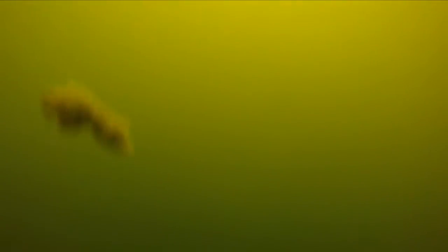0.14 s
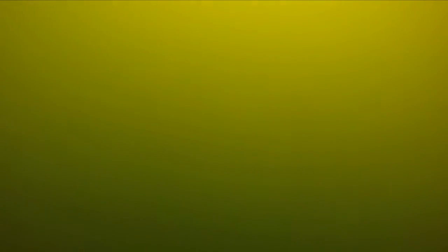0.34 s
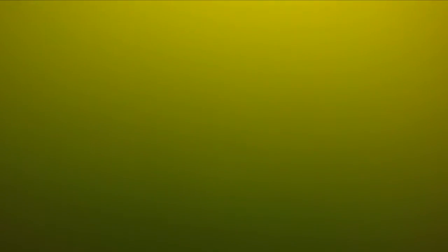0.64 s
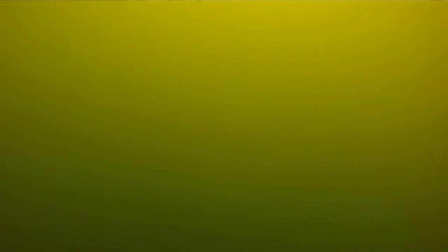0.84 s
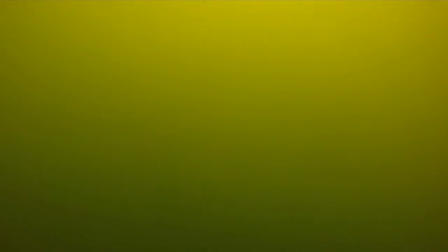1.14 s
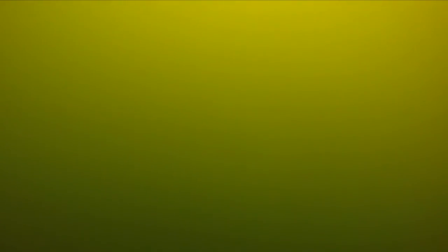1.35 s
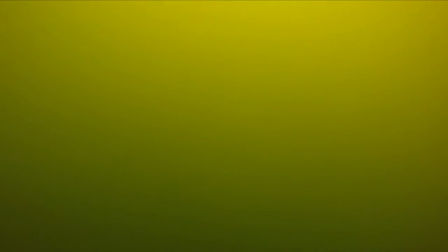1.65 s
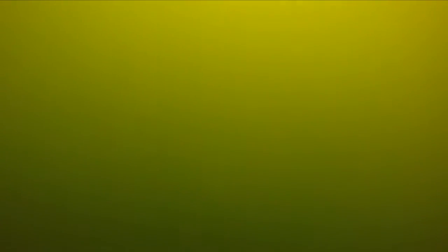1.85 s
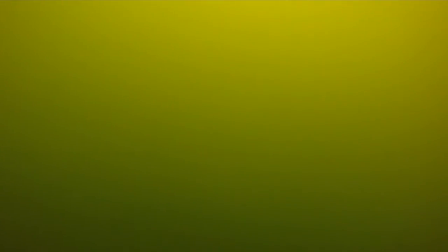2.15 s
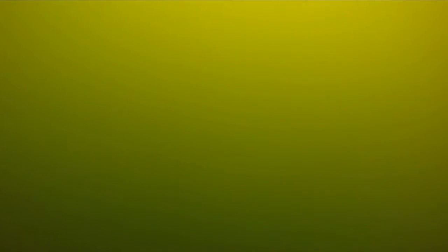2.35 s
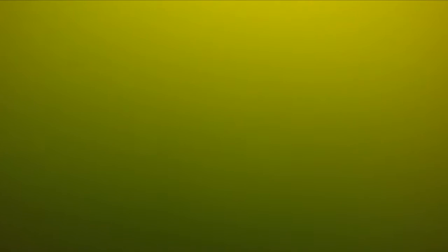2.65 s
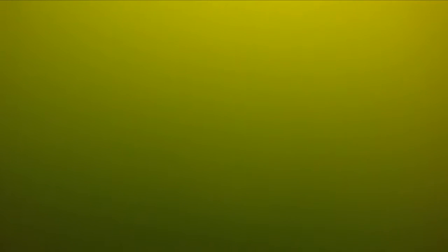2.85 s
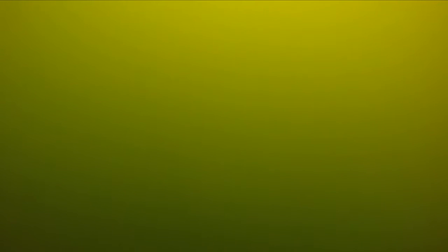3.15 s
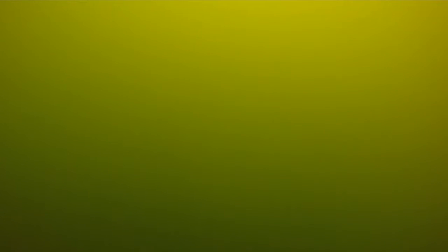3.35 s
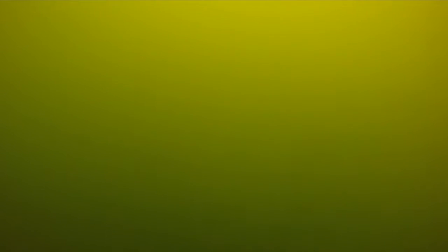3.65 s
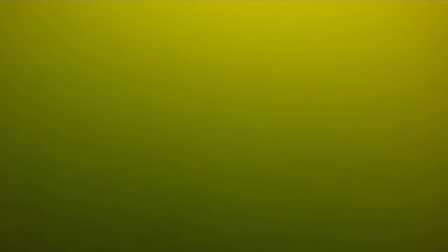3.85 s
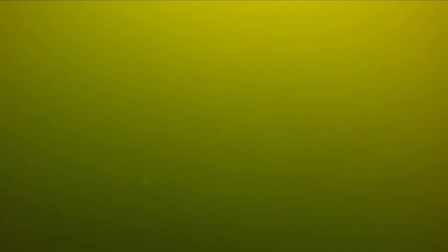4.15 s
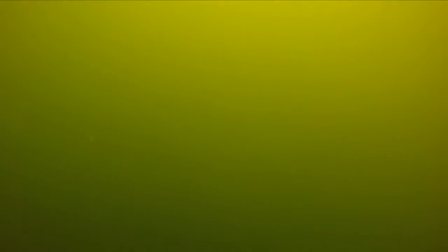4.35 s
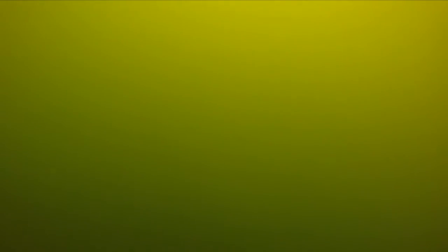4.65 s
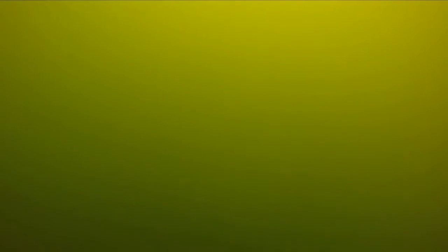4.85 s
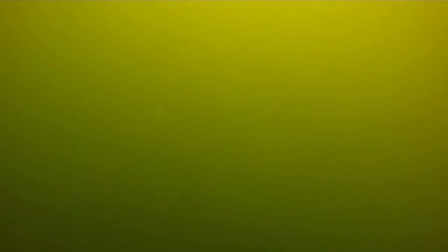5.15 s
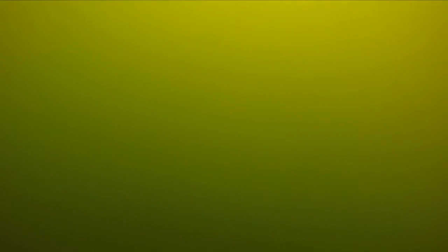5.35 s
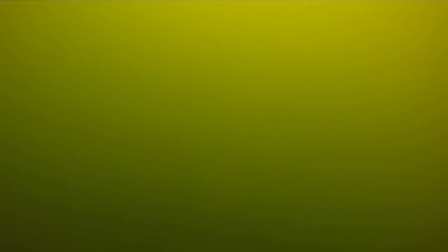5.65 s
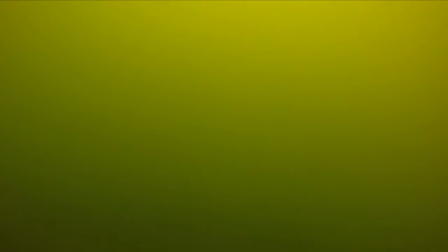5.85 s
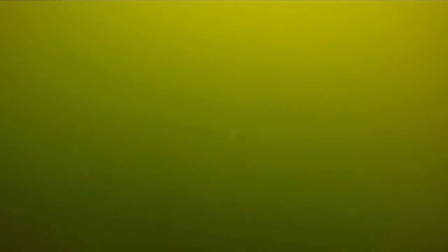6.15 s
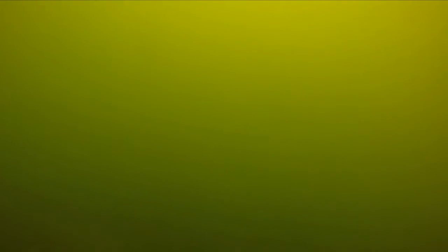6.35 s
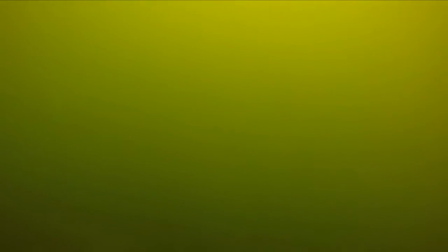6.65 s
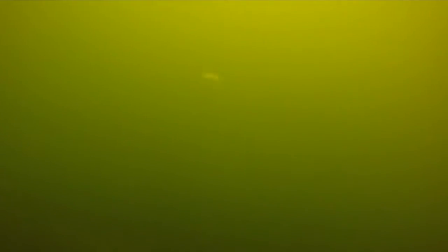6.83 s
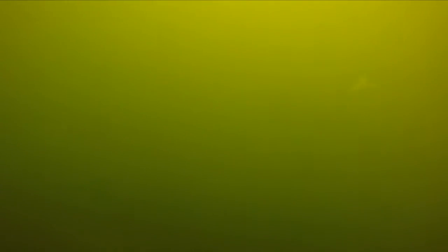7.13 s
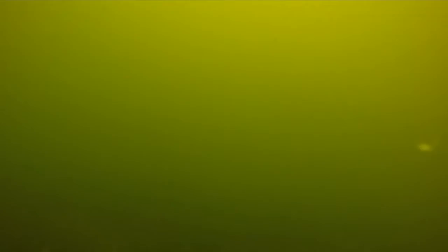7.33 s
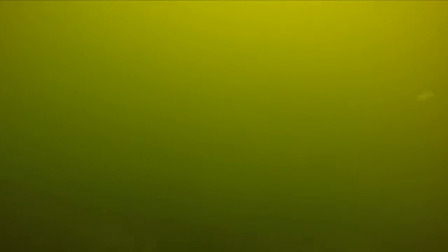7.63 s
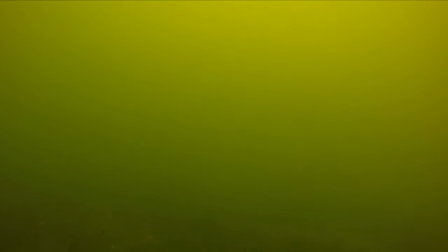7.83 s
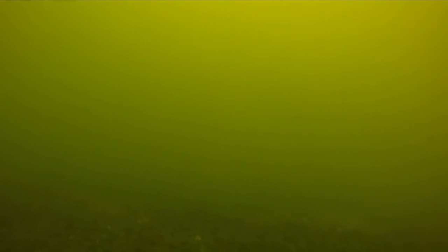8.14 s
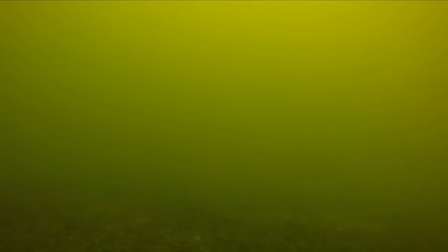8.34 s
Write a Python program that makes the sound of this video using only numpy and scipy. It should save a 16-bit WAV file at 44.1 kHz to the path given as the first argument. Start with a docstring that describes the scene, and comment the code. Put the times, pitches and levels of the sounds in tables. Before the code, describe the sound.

Heard from inside a sealed underwater housing on a weighted pot: a dense, loud clatter of thudding, chirping knocks with gritty line friction, thinning after two seconds. A few hard knocks and small bubbles follow, then quiet hollow hiss, faint electronic hum, low watery rumbles and light taps. At eight seconds the pot clanks and crunches onto the bed, then quickly settles.

```python
"""A rattle of jerky knocks under water thins out into a quiet, humming descent that ends in a hard clank.
A camera in a sealed housing, fixed to a weighted pot, is let down on a line that slips and catches.
Each knock runs down the line as a fast falling chirp and shakes the housing; slips grind and swish.
Filtered noise makes flow rumble, hiss and grit; sines make hum and bubbles; the landing is clanks and crunch."""
import sys
import numpy as np
from scipy import signal
from scipy.fft import rfft, irfft, next_fast_len
from scipy.io import wavfile
from scipy.ndimage import uniform_filter1d

SR = 44100
rng = np.random.default_rng(int(sys.argv[2]) if len(sys.argv) > 2 else 0)


def digitize_waveform(pressure):
    """Quantize a signal to 16-bit integers and store it at the path in sys.argv[1].

    Rows of a 2-D input are taken as channels; values are limited to [-1, 1].
    """
    field = np.atleast_2d(pressure).T
    bounded = np.clip(field, -1, 1)
    quanta = np.round(bounded * 32767).astype(np.int16)
    wavfile.write(sys.argv[1], SR, quanta)


N = 374409
TIME = np.arange(N) / SR  # s
KNOCK_SIZE = 8192  # samples

# the line catching, and light taps on the frame: (time [s], strength [dB], contact softness [0-1])
KNOCKS = [(.0098, -15.5, 0.13), (.03, -5, 0.16), (.0965, -5.5, 0.16), (0.1399, -15, 0.3), (.164, -10.5, .1),
          (0.2269, -5.5, 0.24), (.29, -5.5, 0.24), (.342, -9.5, 0.22), (0.3945, -10.5, 0.24),
          (0.4795, -9.5, 0.35), (0.5316, -14.5, 0.45), (.5572, -7.5, 0.23), (.602, -7, 0.33),
          (0.6321, -6.5, 0.29), (.6842, -10.5, 0.11), (.6925, -9, 0.3), (0.7164, -6, 0.19),
          (0.7621, -8.5, 0.27), (0.79, -7, 0.26), (0.8407, -10, 0.17), (.866, -5.5, 0.24),
          (0.9013, -11, 0.32), (0.9353, -6, 0.14), (0.9827, -12.5, 0.08), (0.9918, -11.5, 0.22),
          (1.0147, -6.5, .15), (1.0656, -13, 0.23), (1.0932, -7, 0.24), (1.1439, -11.5, 0.11),
          (1.1762, -6, 0.23), (1.29, -10.5, 0.2), (1.3019, -15, 0.11), (1.3279, -7, 0.14),
          (1.3438, -19, 0.13), (1.458, -15, 0.13), (1.4763, -12, 0), (1.502, -6.5, 0.13),
          (1.572, -9.5, 0.34), (1.585, -15.5, 0.09), (1.7297, -5.5, 0.23), (1.7563, -16, 0.21),
          (1.77, -9, 0.12), (1.784, -12, .4), (1.7963, -13.5, 0.06), (1.9608, -3.5, 0.17),
          (1.9899, -17.5, 0.11), (2.035, -29, 0.33), (2.162, -8, .08), (2.1967, -18, 0.48),
          (2.403, -45.5, 0.22), (2.6, -36, 0.25), (2.647, -30, 0.7), (2.727, -6, 0.19), (2.7676, -8, 0.31),
          (2.835, -28.5, .2), (2.895, -28.5, 0.3), (3.1003, -4.5, .1), (3.119, -16, 0.6),
          (3.2499, -11.5, 0.18), (3.2733, -4.5, 0.04), (3.3032, -13, 0.15), (3.3987, -22.5, .4),
          (3.514, -22, 0.24), (3.551, -22.5, 0.28), (3.565, -19.5, 1), (3.649, -36.5, 0.19),
          (4.043, -31, 0.15), (4.4375, -23.5, 0.44), (4.4992, -35, .45), (4.604, -34.5, 0.1),
          (4.6228, -31, 0.18), (5.3192, -26.5, .2), (5.3743, -34, 0.37), (5.9374, -26.5, 0.02),
          (5.951, -28, 0.03), (6.0199, -24.5, 0.36), (6.07, -33.5, 0.23), (6.5218, -29, 0.37),
          (6.8198, -26, 0.19), (6.993, -28.5, 0.13), (7.03, -32, 0.15), (7.117, -30.5, 0.36),
          (7.275, -30, 0), (7.3391, -35, 0.04), (7.493, -37.5, 0.11), (7.5808, -28.5, 0.39),
          (7.6788, -29.5, .25), (8.2957, -40, 0.08)]
# the line slips and grinds over the rim: (start [s], length [s], relative grinding level [dB])
SLIDES = [(.003, 0.42, -28.5), (0.448, 0.76, -26), (1.284, 0.092, -31), (1.457, .13, -28.5),
          (1.689, 0.11, -31), (1.9194, 0.063, -30.5), (2.12, 0.077, -36.5), (2.698, 0.079, -35),
          (3.069, 0.073, -31.5), (3.232, 0.078, -34.5)]
# steady background, faint while the line is jerking: (time [s], relative level [dB])
STILL_LEVELS = [(0, -60), (2.3, -57.5), (3.4, -49), (4, -47.5), (7.95, -45.5), (8.1, -51.5), (8.49, -51)]


def from_db(db):
    """Amplitude ratio of a level in dB."""
    return 10 ** (np.asarray(db) / 20)


def rms_one(x):
    """x scaled to rms 1."""
    return x / np.sqrt(np.mean(x ** 2) + 1e-20)


def db_over_time(points):
    """A level curve in dB, sample by sample."""
    s, db = np.transpose(points)
    return np.interp(TIME, s, db)


def bins(size):
    """Frequencies of a spectrum in Hz, kept above zero."""
    return np.maximum(np.arange(size // 2 + 1) * SR / size, 1)


def at_hz(points, hz):
    """A spectrum in dB, joined by lines on a log-frequency axis."""
    f, db = np.transpose(points)
    return np.interp(np.log(hz), np.log(f), db)


def boosts(resonances, hz):
    """Gain in dB of a set of bell-shaped resonances."""
    return sum(db / (1 + (2 * (hz - f) / width) ** 2) for f, width, db in resonances)


def high_pass(hz, corner_hz):
    """First-order response that thins the lows."""
    return 1j * hz / (1j * hz + corner_hz)


def low_pass(hz, corner_hz):
    """First-order response that dulls the highs."""
    return 1 / (1 + 1j * hz / corner_hz)


def causal(db):
    """The minimum-phase filter with this gain: it rings only after it is struck."""
    log_gain = np.log(from_db(np.r_[db, db[-2:0:-1]]))
    return np.exp(np.conj(signal.hilbert(log_gain)))[:len(db)]


def shaped(x, response):
    """x through a filter given as a function of Hz; rms 1."""
    size = 2 * next_fast_len(N // 2 + KNOCK_SIZE)
    return rms_one(irfft(rfft(x, size) * response(bins(size)))[:N])


def noise(spectrum):
    """Noise of a given colour; rms 1."""
    return shaped(rng.standard_normal(N), lambda hz: from_db(at_hz(spectrum, hz)))


def drift(rate_hz):
    """Slow random wander, a new target rate_hz times a second; rms 1."""
    steps = rng.standard_normal(N // 10)
    return rms_one(np.interp(TIME * rate_hz, np.arange(len(steps)), steps))


def steadied(x, window_s):
    """Evens out the chance swells of a noise."""
    return x / np.sqrt(uniform_filter1d(x ** 2, int(window_s * SR)) + 0.018)


def swell(peak_s, rise_s, fall_s):
    """Grows to 1 and dies away, by 60 dB in the times given."""
    distance = np.maximum((peak_s - TIME) / rise_s, (TIME - peak_s) / fall_s)
    return from_db(-60 * np.minimum(distance, 3))


def burst(rise_s, t60_s):
    """Spectrum of a short run of random echoes, energy 1."""
    t = np.arange(KNOCK_SIZE) / SR
    envelope = (1 - np.exp(-t / rise_s)) * np.exp(-np.log(1000) * t / t60_s)
    x = rng.standard_normal(KNOCK_SIZE) * envelope
    return rfft(x / np.linalg.norm(x))


def path(hz):
    """From contact to microphone: bending waves (speed rises as the root of Hz), then frame and housing."""
    # frame spectrum: (frequency [Hz], gain [dB])
    frame_spectrum = [(15, -19), (30, -3), (50, 11.5), (85, 2.5), (115, -2.5), (145, 0), (240, -10),
                      (330, -8), (750, -15), (1020, -26.5), (2600, -30), (2950, -37), (5500, -47.5),
                      (15000, -81)]
    # resonances of the housing: (frequency [Hz], width [Hz], boost [dB])
    housing_modes = [(1435, 554, 10), (1711, 94, 5), (2308, 570, 9.5), (3660, 450, 8), (4310, 290, 5),
                     (5540, 610, 5), (11600, 2500, 7.5)]
    travel_1khz_s = .0036
    lag_s = travel_1khz_s * np.sqrt(1000 / hz)
    resonance = causal(at_hz(frame_spectrum, hz) + boosts(housing_modes, hz))
    return resonance * np.exp(-4j * np.pi * hz * lag_s)  # 4 pi: lag_s is the group delay


def background(hiss_db=-1.5, hum_db=44.5, waver_db=1.5, waver_radians=.3):
    """Hollow hiss of the closed housing with the camera's faint hum and whine."""
    # hiss spectrum: (frequency [Hz], density [dB/Hz, relative])
    still_spectrum = [(150, 0.5), (310, -9.5), (520, -6), (600, -19), (760, -5), (1050, -28), (1450, -20),
                      (1900, -15.5), (2350, -19.5), (2900, -27), (4300, -29.5), (6500, -35.5), (11000, -39),
                      (15500, -44.5)]
    # narrow bands that sing: (frequency [Hz], width [Hz], boost [dB])
    whine_bands = [(1640, 120, 8.5), (3570, 230, 3.5), (6000, 250, 1), (10000, 120, 9.5), (13800, 700, 10)]
    # camera hum: (frequency [Hz], relative rms level [dB])
    hum_tones = [(263.8, -52.5), (463, -71), (532.9, -66), (662.1, -61.5), (732.1, -58), (796.7, -73),
                 (1622, -67), (2369, -81)]
    hiss = shaped(rng.standard_normal(N),
                  lambda hz: from_db(at_hz(still_spectrum, hz) + boosts(whine_bands, hz)))
    hum = np.zeros(N)
    for hz, db in hum_tones:
        amplitude = np.sqrt(2) * from_db(db + waver_db * drift(6.2))
        hum += amplitude * np.sin(2 * np.pi * hz * TIME + waver_radians * drift(2.2))
    return from_db(db_over_time(STILL_LEVELS)) * (from_db(hiss_db) * hiss + from_db(hum_db) * hum)


def flow(sway_db=-1.5, eddy_db=-0.5, shed_db=-17.0):
    """The pot shudders near 50 Hz while eddies flutter off its frame; the current and each swing drive both."""
    # speed of the water past the pot, as relative eddy level: (time [s], level [dB])
    current_levels = [(2.25, -64.5), (2.55, -63), (2.8, -51), (2.95, -44), (3.4, -38), (3.75, -45.5),
                      (4.64, -33.5), (4.92, -46), (5.45, -54), (6.12, -43.5), (6.4, -26), (6.66, -50.5),
                      (7.25, -47), (7.85, -38), (8.17, -44), (8.33, -71), (8.49, -50)]
    # the pot swings on its line: (time of peak [s], relative level [dB])
    swing_peaks = [(2.66, -25), (2.82, -19), (3.36, -36), (3.563, -22.5), (4.23, -31), (4.54, -21.5),
                   (4.61, -20.5), (4.69, -20), (5.32, -38.5), (5.86, -32), (6.0, -27.5), (6.54, -27.5),
                   (6.9, -21), (7.075, -26.5), (7.35, -31), (7.506, -19), (7.61, -24), (7.824, -15.5),
                   (8.12, -25.5), (8.24, -33)]
    # shudder spectrum: (frequency [Hz], density [dB/Hz, relative])
    sway_spectrum = [(12, -41.5), (28, -16), (41, -7), (52, 3.5), (68, -6), (90, -19.5), (140, -27.5),
                     (400, -93)]
    # eddy spectrum: (frequency [Hz], density [dB/Hz, relative])
    eddy_spectrum = [(70, -25), (110, -4.5), (145, 2.5), (200, -7.5), (300, -16), (450, -20.5),
                     (700, -31.5), (1100, -41), (4000, -85.5)]
    recoil_db = -19.5  # the pot swings when a slip stops
    current = from_db(db_over_time(current_levels))
    recoils = [(s + length, recoil_db) for s, length, _ in SLIDES]
    swings = sum(from_db(db) * swell(s, rise_s=0.25, fall_s=0.28) for s, db in swing_peaks + recoils)
    sway_level = np.hypot(swings, from_db(sway_db) * current)
    eddy_level = np.hypot(from_db(shed_db) * swings, from_db(eddy_db) * current)
    sway = sway_level * steadied(noise(sway_spectrum), window_s=0.07)
    eddies = eddy_level * steadied(noise(eddy_spectrum), window_s=0.073)
    return sway + eddies


def specks(per_s=60, spread_db=3.5, level_db=-10, low_hz=420, high_hz=1100):
    """Drifting grit patters dully on the housing: random smeared touches, following the background level."""
    sizes = from_db(spread_db * np.minimum(rng.exponential(1, N), 3))
    touches = sizes * (rng.random(N) < per_s / SR)
    touches = signal.fftconvolve(touches, irfft(burst(rise_s=.005, t60_s=.03)))[:N]
    patter = shaped(touches, lambda hz: path(hz) * high_pass(hz, low_hz) ** 2 * low_pass(hz, high_hz))
    return from_db(db_over_time(STILL_LEVELS) + level_db) * patter


def bubbles(rise_per_s=0.8, count=3, t60_s=.11):
    """Air leaves the pot in little clusters; each bubble rings briefly and rises in pitch."""
    # clusters: (time [s], centre frequency [Hz], level of each bubble [dB])
    clusters = [(2.83, 460, -42), (2.858, 490, -45), (2.885, 690, -34), (3.01, 420, -47), (3.8, 520, -50),
                (3.957, 460, -42), (4.06, 650, -50), (4.13, 580, -48), (4.435, 530, -43)]
    out = np.zeros(N + KNOCK_SIZE)
    t = np.arange(KNOCK_SIZE) / SR
    fade = (1 - np.exp(-t / 0.00034)) * np.exp(-np.log(1000) * t / t60_s)
    for s, hz, db in clusters:
        for late_s, octaves in rng.uniform([-.006, -.1], [.012, .1], (count, 2)):
            at = int((s + late_s) * SR)
            tone = np.sin(2 * np.pi * hz * 2 ** octaves * t * (1 + rise_per_s * t))
            out[at:at + KNOCK_SIZE] += from_db(db) * fade * tone
    return out[:N]


def swish(rough_db=2.5, level_db=-5.0, dull_hz=7000, fullness=0.67):
    """Fine friction hiss that swells as the line picks up speed."""
    # soft swishes: (start [s], length [s], share of length spent rising [0-1], relative level [dB])
    smooth_runs = [(1.22, 0.1, 0.51, -48), (2.026, 0.13, 0.54, -53), (2.347, 0.077, 0.59, -61),
                   (2.488, 0.12, 0.63, -56.5), (2.798, 0.25, 0.16, -56), (3.35, .12, 0.26, -51.5),
                   (3.488, 0.068, 0.22, -38.5), (4.146, 0.13, 0.72, -44), (5.856, .15, 0.52, -47),
                   (6.817, 0.231, 1, -37.5), (7.46, .22, .45, -59), (8.11, 0.07, 0.97, -36.5)]
    # hiss spectrum: (frequency [Hz], density [dB/Hz, relative])
    swish_spectrum = [(300, -25), (1000, -8), (2200, 2), (3000, -3), (4200, -1), (5200, 1), (5800, -6),
                      (7300, -6), (8500, -12), (11500, -15), (15000, -25)]
    level = np.zeros(N)
    for s, length, rising, db in smooth_runs:
        peak = np.clip(rising, .05, .95)
        level += from_db(db) * np.interp((TIME - s) / length, [0, peak, 1], [0, 1, 0]) ** fullness
    hiss = shaped(rng.standard_normal(N),
                  lambda hz: from_db(at_hz(swish_spectrum, hz)) / (1 + (hz / dull_hz) ** 2))
    return level * from_db(level_db + rough_db * drift(130)) * hiss


def grinding(force, slips_per_s, clump_db, spread_db, low_hz, bright_hz):
    """Dense tiny slips of clumped strength travel the same path as the knocks."""
    size_db = spread_db * np.minimum(rng.exponential(1, N), 3) + clump_db * drift(150)
    sizes = from_db(size_db) * rng.choice([-1, 1], N)
    impulses = rms_one(sizes * (rng.random(N) < slips_per_s / SR))
    slips = force * steadied(impulses, window_s=0.056)
    sound = shaped(slips, lambda hz: path(hz) * high_pass(hz, low_hz) * low_pass(hz, bright_hz))
    return np.sqrt(np.mean(force ** 2)) * sound


def slides(slide_db=5.5, edge_s=0.013, snag_db=-11.0, scuff_db=-19.0, scuff_rise_s=0.13, scuff_fall_s=0.11):
    """The line grinds as it runs under load and scuffs around each catch; its fibres snag in bright scratches."""
    running = sum(from_db(db + slide_db) * ((TIME >= s) & (TIME < s + length))
                  for s, length, db in SLIDES)
    catches = np.zeros(N)
    for s, db, _ in KNOCKS:
        catches[int(s * SR)] = from_db(db + scuff_db)
    scuff_shape = swell(0.5024, scuff_rise_s, scuff_fall_s)[:SR]
    scuffs = signal.fftconvolve(catches, scuff_shape, "same")
    force = np.hypot(uniform_filter1d(running, int(edge_s * SR)), scuffs)
    clump_db, spread_db = 4.5, 3.0
    grind = grinding(force, 1700, clump_db, spread_db, low_hz=60.4, bright_hz=5500)
    snags = grinding(force, 150, clump_db, spread_db, low_hz=7040, bright_hz=15000)
    scratches = signal.fftconvolve(snags, irfft(burst(rise_s=.003, t60_s=.014)))[:N]
    return grind + from_db(snag_db) * scratches


def landing(shudder_hz=59, shudder_db=0.0, shudder_t60_s=0.17, crunch_db=-11.5, crunch_t60_s=.07,
            press_s=.13, drag_db=-33.5, drag_s=0.13, drag_t60_s=0.35):
    """The pot crunches into the bed, shudders on a decaying sine and drags a little way."""
    touchdown_s, seated_s = 7.975, 8.025  # the pot meets the bed; its full weight arrives
    down = TIME > touchdown_s
    # held at full level, then dying away
    drag = from_db(drag_db) * np.minimum(1, swell(seated_s + drag_s, np.inf, drag_t60_s))
    crunch = down * (from_db(crunch_db) * swell(seated_s, press_s, crunch_t60_s) + drag)
    bed = grinding(crunch, slips_per_s=5200, clump_db=3.5, spread_db=4.0, low_hz=750, bright_hz=6000)
    shudder = down * swell(seated_s, press_s, shudder_t60_s)
    return bed + from_db(shudder_db) * shudder * np.sin(2 * np.pi * shudder_hz * (TIME - touchdown_s))


def contact_point(hz, spread_db=3.0, count=24):
    """Each place of contact favours some of the frame's resonances over others."""
    centres_hz = np.geomspace(100, 10 ** 4, count)
    favour = np.interp(np.log(hz), np.log(centres_hz), rng.uniform(-1.66, 1, count))
    return from_db(spread_db * favour)


def blows():
    """Time and dB of the four parts for every blow: heavy ones thud, hard ones ring."""
    # per part, (thud, hollow, ring, edge): weight in a hard knock of full strength [dB]
    touch_db = [-0.5, -5, 9.5, 0.5]
    # per part: growth with strength [dB/dB]; only heavy knocks shake the whole pot
    touch_growth = [1.506, 0.95, 1.02, 1.227]
    # per part: loss when the contact is fully soft [dB]
    soft_loss_db = [-11, 0, 36.5, 36]
    # per part: weight in a clank [dB]
    clank_db = [-11.5, -16, -0.5, -3]
    # every slip opens with a soft tug and a tick: (delay [s], strength [dB], softness [0-1])
    breakaway = [(0, -12.5, 0.8), (0.0127, -20, 0.18)]
    # the pot's rim strikes the bed, then its base: (time [s], strength [dB])
    clanks = [(7.98, 2), (7.983, -6), (7.9914, -7.5), (8.012, -8), (8.02, -3), (8.024, -9)]
    tugs = [(start + delay, db, soft) for start, _, _ in SLIDES for delay, db, soft in breakaway]
    out = []
    for s, db, soft in KNOCKS + tugs:
        change_db = db * np.array(touch_growth) - soft * np.array(soft_loss_db)
        out.append((s, np.add(touch_db, change_db)))
    return out + [(s, np.add(clank_db, db)) for s, db in clanks]


def knocks(scatter_low_hz=200, scatter_high_hz=4000, scatter_db=-2.5, rasp_hz=3300, rasp_db=4.5,
           lead_s=.0026):
    """Each knock is a falling chirp ending in a thud; its top is a short rasp, and echoes scatter in the frame."""
    # centres of thud, hollow, ring and edge: (frequency [Hz])
    touch_hz = [75, 420, 2000, 4500]
    hz = bins(KNOCK_SIZE)
    bands = [np.interp(np.log(hz), np.log(touch_hz), row) for row in np.eye(len(touch_hz))]
    parts = path(hz) * bands
    parts = parts / np.abs(irfft(parts)).max(axis=1, keepdims=True)
    scattered = from_db(scatter_db) * high_pass(hz, scatter_low_hz) * low_pass(hz, scatter_high_hz)
    clean = 1 / (1 + (hz / rasp_hz) ** 4)
    tail_fade = np.cos(np.linspace(0, np.pi / 2, KNOCK_SIZE)) ** 2  # each knock fades smoothly to silence
    out = np.zeros(N + KNOCK_SIZE)
    for s, part_db in blows():
        contact = clean + (1 - clean) * from_db(rasp_db) * burst(rise_s=0.0016, t60_s=0.013)
        echoes = scattered * burst(rise_s=.004, t60_s=.06)
        blow = contact_point(hz) * (from_db(part_db) @ parts)
        at = max(int((s - lead_s) * SR), 0)  # leads, to allow for the travel time
        out[at:at + KNOCK_SIZE] += irfft(blow * (contact + echoes)) * tail_fade
    return out[:N]


def scene():
    """The line, the landing, the water and the background, summed to one channel."""
    line = knocks() + slides() + swish()
    water = flow() + specks() + bubbles()
    return (line + landing() + water + background())[None]


def record(dry):
    """The hardest knocks overload the microphone, rounding towards 1; the top is cut."""
    rounded = dry / (1 + dry ** 6) ** (1 / 6)
    stopband_hz = 15900  # 70 dB down from here up
    low_pass_sos = signal.cheby2(16, 70, stopband_hz, fs=SR, output="sos")
    return signal.sosfilt(low_pass_sos, rounded)


dry = scene()
out = record(dry)
digitize_waveform(out)
```